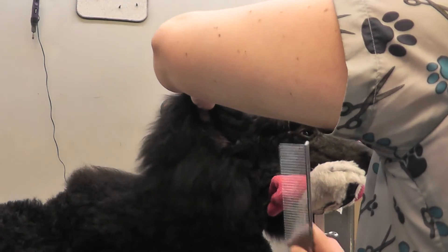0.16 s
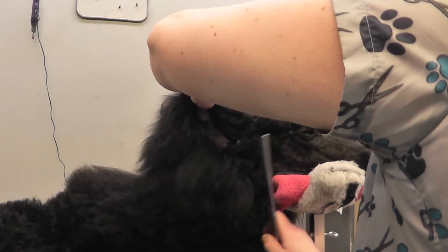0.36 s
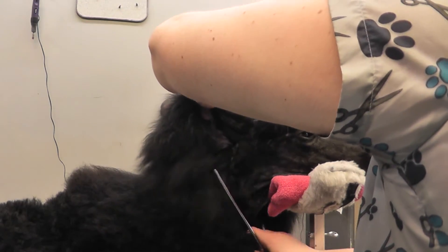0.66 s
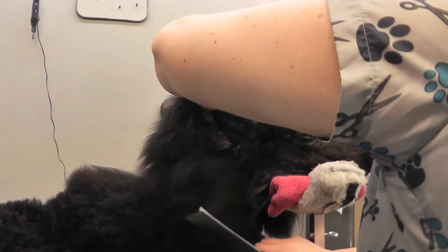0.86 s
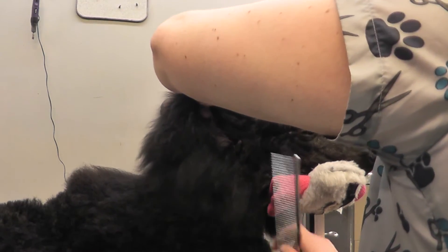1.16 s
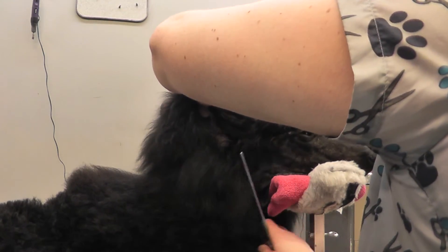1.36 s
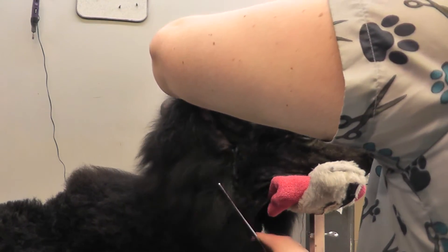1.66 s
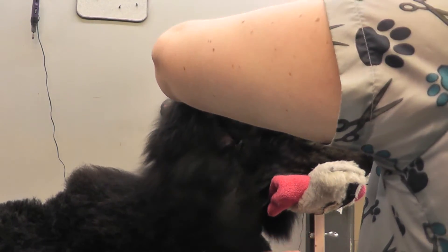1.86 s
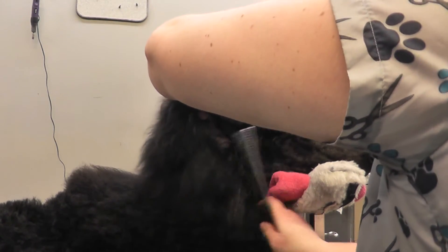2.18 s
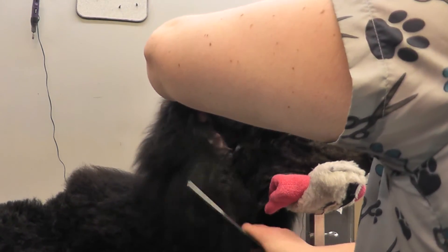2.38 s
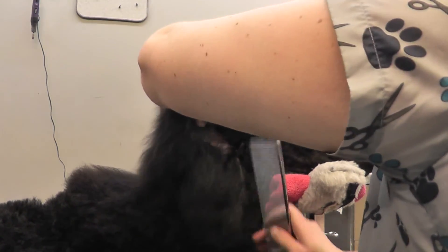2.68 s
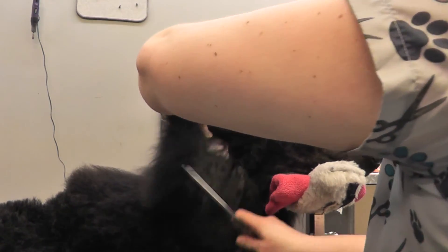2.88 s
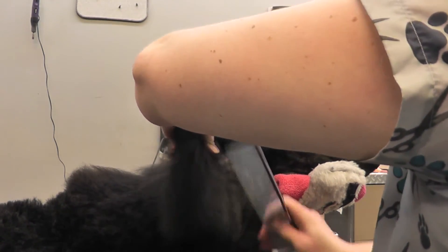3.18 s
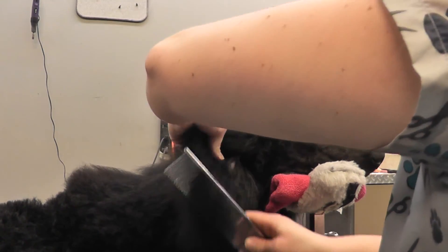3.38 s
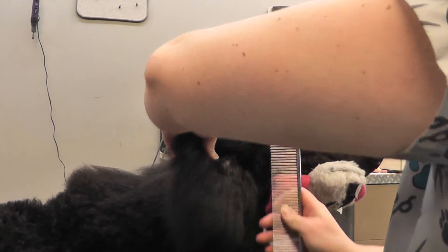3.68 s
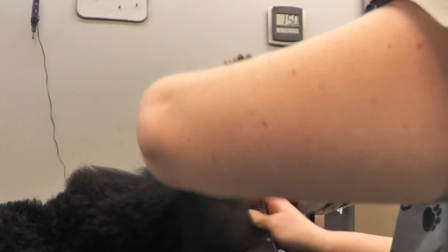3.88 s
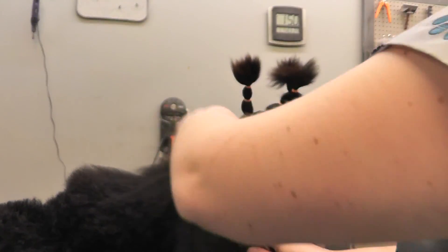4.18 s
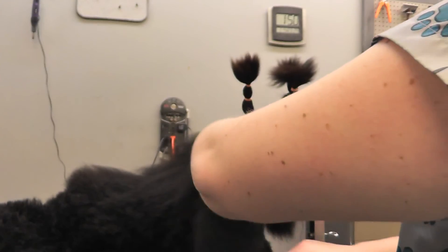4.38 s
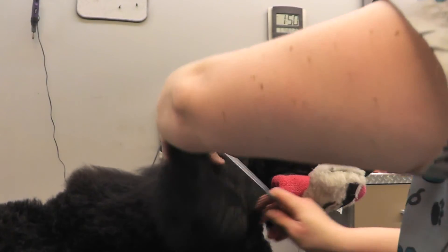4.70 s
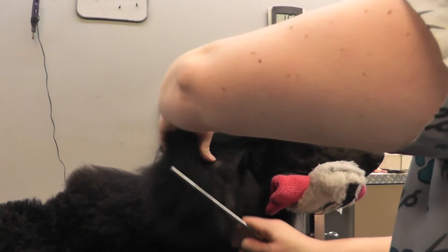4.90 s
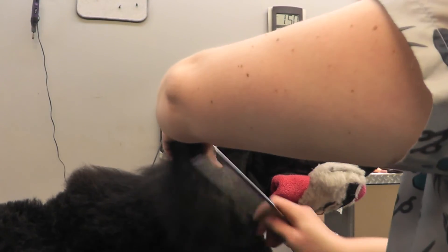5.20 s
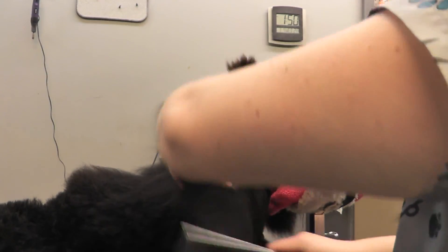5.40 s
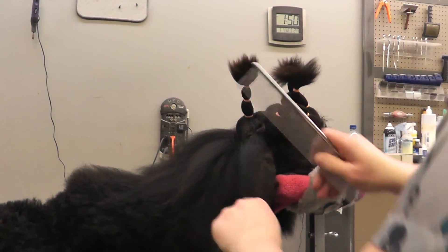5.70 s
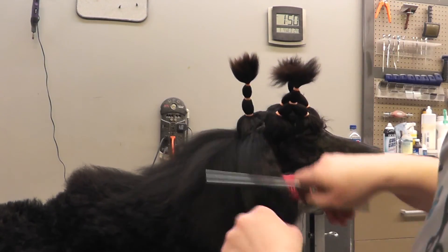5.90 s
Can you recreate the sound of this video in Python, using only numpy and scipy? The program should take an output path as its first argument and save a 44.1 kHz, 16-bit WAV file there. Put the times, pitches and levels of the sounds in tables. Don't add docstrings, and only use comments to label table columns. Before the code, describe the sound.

A small, hard-walled grooming room, heard from close by in stereo. Throughout, a mains-powered machine gives a low steady hum strongest around 240 hertz, with soft air noise, a faint panel buzz and a throb nearly three times a second. From 0.1 to 1 s, light comb strokes hiss through long dog hair, with small ticks. At 1.27 s the metal comb clacks on a steel edge, bright and by far the loudest event, bouncing instantly and ringing for under half a second. Dull table thuds follow at 1.4 s. Strokes continue from 1.45 to 5.4 s, some short and scratchy, with faint high whistles near 1.7 to 1.9 s and sleeve rustles from 2.2 s. A low creak comes around 4 s. Between 5.4 and 5.9 s a hand sweeps the coat as cloth rustle grows, with a snap at 5.88 s. From 5.99 s a hollow, gritty scrape judders abruptly to the end.

```python
import sys
import numpy as np
from scipy import signal
from scipy.fft import rfft, irfft, next_fast_len
from scipy.io import wavfile
from scipy.ndimage import uniform_filter1d

SR = 44100
rng = np.random.default_rng(int(sys.argv[2]) if len(sys.argv) > 2 else 0)


def transcribe(signal):
    frames = np.atleast_2d(signal).T
    limited = np.clip(frames, -1, 1)
    pcm = np.round(limited * 32767).astype(np.int16)
    wavfile.write(sys.argv[1], SR, pcm)


def attenuation_scalar(level_db):
    decades = np.asarray(level_db, float) / 20
    return 10 ** decades


N = 266805
T = np.arange(N) / SR
MAINS_HZ = 60.0023

# (time [s], peak level [dB])
CLACK_HITS = [
    (1.2671, 0),
    (1.2683, -10),
    (1.271, -17),
]


def colour(x, points):
    hz, db = np.transpose(points)
    size = next_fast_len(x.shape[-1])
    bins_hz = np.arange(1, size // 2 + 2) * SR / size
    gain = attenuation_scalar(np.interp(np.log(bins_hz), np.log(hz), db))
    return irfft(rfft(x, size) * gain, size)[..., :x.shape[-1]]


def unit(x):
    return x / np.sqrt(np.mean(x ** 2))


def band(x, hz, width):
    return signal.lfilter(*signal.iirpeak(min(hz, .45 * SR), hz / width, SR), x)


def resonance(x, hz, width):
    return band(band(x, hz, width), hz, width)


def walk(rate):
    hold = int(SR / rate)
    steps = np.repeat(rng.standard_normal(N // hold + 1), hold)
    return uniform_filter1d(uniform_filter1d(steps, hold), hold)[:N]


def strike(hits, modes, scatter_db):
    out, t = np.zeros(N), T[:SR // 2]
    hz, db, t60 = np.transpose(modes)[:, :, None]
    decay = attenuation_scalar(-60 * t / np.clip(t60, .01, .35))
    for (s, peak_db), luck in zip(hits, rng.standard_normal((len(hits), len(modes), 2))):
        start = int(s * SR)
        strength = attenuation_scalar(db + scatter_db * luck[:, :1]) * np.sign(luck[:, 1:])
        ring = (strength * np.sin(2 * np.pi * hz * t) * decay).sum(axis=0)[:N - start]
        out[start:start + len(ring)] += attenuation_scalar(peak_db) * ring / np.abs(ring).max()
    return out


def strokes(rows):
    grip_s, let_go_s = 0.0071, 0.046
    gain = np.zeros(N)
    for start, end, first_db, last_db in rows:
        slide = attenuation_scalar(np.interp(T, (start, end), (first_db, last_db)))
        grip = 1 - np.exp(-np.maximum(T - start, 0) / grip_s)
        gain += slide * grip * np.exp(-np.maximum(T - end, 0) / let_go_s)
    return gain


def rustle(rows, points, grain_db, side_db, patchy_db):
    size_db = grain_db * np.minimum(rng.exponential(size=N), 5.5) + patchy_db * walk(40)
    grains = rng.standard_normal((2, N)) * attenuation_scalar(size_db)
    mid, side = (unit(colour(g, points)) * strokes(rows) for g in grains)
    return np.array([mid + attenuation_scalar(side_db) * side, mid - attenuation_scalar(side_db) * side])


def spread(x, lag_s, side_db):
    side = attenuation_scalar(side_db) * np.roll(band(x, 1400, 1400), int(lag_s * SR))
    return np.array([x + side, x - side])


def hum():
    # (multiple of mains [1], left [dB], right [dB], phase by which left leads [rad])
    harmonics = [(1, -63, -65, -.6), (2, -36.5, -39.8, .1), (3, -50, -52.5, -.14), (4, -29.3, -28.7, .08),
                 (6, -39.7, -39.8, -.23), (7, -63, -60, -.1), (8, -62, -46, -3.1), (10, -69, -64, 0),
                 (12, -59, -55, .5), (13, -63, -67, -.2), (18, -64, -63, -.3), (22, -70, -70, 0),
                 (24, -61, -66, -1.2), (26, -70, -68, -.3), (38, -72, -72, 0)]
    offset, slope, bend = (-1.3, -.375, -.19)
    out = np.zeros((2, N))
    for k, left_db, right_db, lead in harmonics:
        phase = 2 * np.pi * k * MAINS_HZ * T + offset + slope * k + bend * k ** 2
        level = attenuation_scalar(np.array([[left_db], [right_db]]))
        turn = np.exp(.5j * np.array([[lead], [-lead]]))
        out += (level * turn * np.exp(1j * phase)).real
    return np.sqrt(2) * out * attenuation_scalar(.5 + .3 * walk(3) + .2 * walk(6))


def machine():
    # (frequency [Hz], level [dB per Hz])
    air_mid = [(20, -96), (36, -83), (47, -76), (65, -76), (120, -71.5), (230, -68), (330, -73.5),
               (550, -76.5), (770, -82), (850, -82.5), (1700, -88), (3800, -94), (7000, -99), (11000, -104)]
    # (frequency [Hz], level [dB per Hz])
    air_side = [(20, -111), (60, -76), (130, -68), (280, -70), (520, -72.5), (800, -79.5), (1400, -87),
                (2300, -98.5), (3100, -108), (3600, -135), (8200, -135), (10000, -112), (14000, -110),
                (15500, -118)]
    # (frequency [Hz], width [Hz], level [dB], depth [dB])
    cabinet = [(183.5, 14, -50.5, 0), (273.6, 24, -54, 0.5), (672.4, 65, -57.5, 5), (756.4, 25, -62, 5),
               (44.6, 11, -62.5, 4), (117.4, 19, -53.5, 7.5)]
    # (frequency [Hz], width [Hz], level [dB])
    panel = [(2670, 134, -62.5), (2920, 550, -63.5), (2060, 160, -67), (4570, 260, -71)]
    throb_hz, throb_first_s = 2.9, 0.27
    white = rng.standard_normal((2, N)) * np.sqrt(SR / 2)
    mid = colour(white[0], air_mid + [(16000, -110)])
    side = colour(white[1], air_side)
    turn = np.cos(2 * np.pi * throb_hz * (T - throb_first_s))
    for hz, width, db, depth_db in cabinet:
        mid = mid + attenuation_scalar(db + depth_db * turn) * unit(resonance(rng.standard_normal(N), hz, width))
    cycle = T * MAINS_HZ + .13
    luck = rng.standard_normal(int(cycle[-1]) + 1)[cycle.astype(int)]
    size = attenuation_scalar(3.5 * luck + .8 * walk(3.04))
    rattle = rng.standard_normal(N) * (.35 + size * np.exp(-(cycle % 1) / .12))
    for hz, width, db in panel:
        mid = mid + attenuation_scalar(db) * unit(resonance(rattle, hz, width))
    return np.array([mid + side, mid - side])


def hair():
    # (start [s], end [s], first level [dB], last level [dB])
    pulls = [(.08, .27, -58, -61), (.34, .55, -56, -57), (.57, .7, -63, -65), (.76, .975, -60.5, -57),
             (1.45, 1.975, -57, -58), (2.06, 2.13, -60, -60), (2.19, 2.27, -48, -50),
             (2.31, 2.53, -65, -57), (2.58, 2.78, -63, -58.5), (2.81, 2.85, -49, -56),
             (2.89, 3.0, -67, -53), (3.02, 3.1, -65, -62), (3.13, 3.475, -65, -55),
             (3.6, 4.115, -60.5, -52.5), (4.19, 4.68, -58.5, -56.5), (4.68, 4.77, -63, -48),
             (4.82, 5.05, -60, -54), (5.18, 5.4, -61, -56.5)]
    # (frequency [Hz], level [dB per Hz])
    coat = [(1500, -10), (3300, 7), (5000, 0.5), (6500, 2.5), (9000, -1), (11000, -9.5), (15500, -14)]
    # (start [s], end [s], first level [dB], last level [dB])
    sweeps = [
        (5.37, 5.55, -58, -52),
        (5.57, 5.83, -55.5, -51),
        (5.855, 5.94, -51, -52.5),
    ]
    # (frequency [Hz], level [dB per Hz])
    palm = [(1200, -26), (2200, -7), (3600, 0.5), (5000, -5.5), (6500, -2.5), (9000, -11), (11000, -20),
            (15000, -29)]
    combed = rustle(pulls, coat, grain_db=4.0, side_db=-18.5, patchy_db=1.0)
    return combed + attenuation_scalar(3.0) * rustle(sweeps, palm, grain_db=3.0, side_db=-15.5, patchy_db=1.3)


def ticks():
    # (time [s], peak level [dB], frequency [Hz], width [Hz])
    snaps = [(.357, -41, 7000, 5000), (.9457, -36, 2930, 900), (1.385, -33, 910, 250),
             (1.385, -34, 1410, 300), (1.385, -38, 2500, 1190), (1.927, -39, 7000, 3500),
             (1.948, -44, 7000, 2500), (1.959, -46, 6500, 5000), (1.972, -42, 6500, 2500),
             (1.987, -47, 7500, 3000), (2.197, -45, 3400, 490), (2.263, -36, 8700, 1500),
             (2.264, -51, 9750, 45), (2.264, -51, 11400, 300), (3.012, -43, 6570, 500),
             (3.461, -47, 8500, 3000), (4.437, -40, 7500, 3500), (5.604, -36, 1300, 1200),
             (5.795, -34, 650, 300), (5.8794, -24.5, 600, 700), (5.8797, -25.5, 2200, 1300),
             (2.264, -42, 3200, 500), (5.794, -38.5, 1600, 1500), (5.729, -34, 800, 600)]
    out, t = np.zeros(N), T[:SR // 20]
    for (s, db, hz, width), noise in zip(snaps, rng.standard_normal((len(snaps), len(t)))):
        snap = band(band(noise * np.exp(-t / 0.00084), hz, width), hz, 2 * width)
        out[int(s * SR):int(s * SR) + len(t)] += attenuation_scalar(db) * snap / np.abs(snap).max()
    return out


def clack():
    # (frequency [Hz], level [dB], t60 [s])
    comb = [(800, -20, 0.025), (1414, -19, .12), (1640, -20, 0.13), (1300, -7.5, 0.043), (2087, -9, 0.028),
            (2500, -22, 0.075), (3200, -21, 0.018), (3580, -29, 0.39), (3602, -3.5, 0.035),
            (3650, -24.5, .3), (4330, -15, 0.037), (4740, -24, 0.13), (5700, -8, 0.019), (5950, -1, 0.015),
            (6557, -30, .15), (6870, -2, 0.041), (7330, -18, 0.14), (8380, -0.5, 0.022),
            (9130, 7.5, 0.0079), (9030, -12, 0.035), (11400, -27, 0.016)]
    # (frequency [Hz], level [dB per Hz])
    contact = [(600, -25), (1000, -22), (1500, 2.5), (2100, -21), (2700, -16), (3500, 8), (4700, -14),
               (6000, -3.5), (9200, -3), (10800, -15), (11400, -45), (12400, -43), (13100, -15),
               (15800, -30), (16300, -71)]
    # (frequency [Hz], t60 [s])
    room = [(1500, 0.62), (3500, 0.58), (6500, 0.42), (9000, 0.094), (14000, 0.12)]
    # (delay [s], level [dB])
    echoes = [(.0065, -27), (0.0131, -10), (.024, -29)]
    # (frequency [Hz], width [Hz], level [dB], t60 [s])
    edge = [(1390, 120, -38.5, 0.41), (1630, 99, -40.5, 0.51), (2500, 570, -38.5, 0.39),
            (3510, 460, -28, 0.35), (4180, 520, -33.5, 0.29), (5080, 400, -37, .22), (5920, 650, -31, 0.29),
            (6700, 660, -28, 0.25), (8200, 800, -34, 0.23), (9300, 580, -29.5, 0.19),
            (10500, 500, -40, 0.11), (13200, 700, -49, .2), (15000, 800, -47, .2)]
    contact_s = 0.00014
    first_s, t = CLACK_HITS[0][0], T[:SR // 2]
    start = int(first_s * SR)
    gate = np.zeros(len(t))
    for s, db in CLACK_HITS:
        since = t + first_s - s
        gate += attenuation_scalar(db) * (t >= s - first_s) * np.exp(-np.maximum(since, 0) / 0.002)
    crack = colour(gate * rng.standard_normal(len(t)), contact) * (t < .2)
    ring = strike(CLACK_HITS, comb, scatter_db=0.5)[start:start + len(t)]
    direct = (attenuation_scalar(-3.0) * ring + attenuation_scalar(-2.0) * crack) * (1 - np.exp(-(t / contact_s) ** 2))

    diffuse = rng.standard_normal((2, len(t))) * (1 - np.exp(-t / 0.0079))
    shiver = sum(unit(resonance(diffuse, hz, width)) * attenuation_scalar(db - 60 * t / t60) for hz, width, db, t60 in edge)
    paths = sum(resonance(diffuse, hz, 1.0 * hz) * attenuation_scalar(-60 * t / t60) for hz, t60 in room)
    reverb = signal.fftconvolve(ring[None], paths, axes=1)[:, :len(t)]
    mid, side = shiver + attenuation_scalar(-48) * reverb

    early = direct + sum(attenuation_scalar(db) * np.roll(direct, int(s * SR)) for s, db in echoes)
    lean = attenuation_scalar(-14) * band(early, 11000, 7000)
    mid, side = early + mid, attenuation_scalar(-14.0) * side - lean
    return np.pad(np.array([mid + side, mid - side]), ((0, 0), (start, N - start - len(t))))


def bumps():
    # (time [s], peak level [dB])
    blows = [
        (1.386, -23.5),
        (1.402, -24.5),
        (1.45, -28),
    ]
    # (frequency [Hz], level [dB], t60 [s])
    tabletop = [(45, -13, 0.21), (141, -20, 0.16), (207, 4, 0.18), (280, -4, 0.24), (384, -9, 0.075),
                (1350, -16, 0.097)]
    return strike(blows, tabletop, scatter_db=5.5)


def whistles():
    # (start [s], length [s], frequency [Hz], width [Hz], level [dB])
    tones = [(1.68, .07, 8200, 250, -68), (1.82, .11, 12600, 350, -62), (2.815, 0.029, 8500, 6000, -53),
             (3.45, 0.048, 9300, 2500, -61), (1.6, 0.1, 3700, 800, -63)]
    out = np.zeros(N)
    for s, length, hz, width, db in tones:
        swell = np.sin(np.pi * np.clip((T - s) / length, 0, 1))
        out += attenuation_scalar(db) * unit(resonance(rng.standard_normal(N), hz, width)) * swell
    return out


def arm():
    # (start [s], end [s], first level [dB], last level [dB])
    moves = [(2.2, 2.44, -52, -61), (2.48, 2.6, -50, -67), (2.82, 2.9, -53, -60), (3.74, 4.3, -56, -59),
             (4.63, 4.8, -60, -53), (4.84, 5.04, -65, -56), (5.3, 5.9, -64, -45.5), (5.93, 5.99, -69, -49)]
    # (frequency [Hz], level [dB per Hz])
    cloth = [(250, -26), (500, 4.5), (900, 1), (1500, 0.5), (3000, -8.5), (8000, -39)]
    # (start [s], end [s], first level [dB], last level [dB])
    leaning = [(3.94, 4.115, -41, -43.5)]
    # (frequency [Hz], level [dB per Hz])
    creak = [(330, -23), (490, -2.5), (600, -12), (760, -9), (1000, -17), (1500, -30), (3000, -61)]
    sleeve = rustle(moves, cloth, grain_db=5.5, side_db=-12.5, patchy_db=1.7)
    return attenuation_scalar(1.5) * sleeve + rustle(leaning, creak, grain_db=2.5, side_db=-6, patchy_db=3.5)


def scrape():
    # (time [s], peak level [dB])
    slips = [(5.9915, -27.5), (5.9945, -27.5), (6.004, -40), (6.012, -36), (6.0187, -21.5), (6.023, -25.5),
             (6.028, -32), (6.034, -29), (6.039, -30), (6.0455, -23), (6.048, -29)]
    # (frequency [Hz], level [dB], t60 [s])
    hollow = [(452, 2.5, 0.085), (560, 0, 0.041), (700, -3, 0.11), (960, 0, 0.032), (1440, -1, 0.034),
              (2500, -19, .012), (3770, -5, .012), (6000, -10, 0.019)]
    rasp_db, rasp_rise_db_per_s = -43.5, 148
    since = T - slips[0][0]
    gate = (since > 0) * attenuation_scalar(rasp_db + rasp_rise_db_per_s * since)
    for s, db in slips:
        gate = gate + attenuation_scalar(db - 10.5) * (T >= s) * np.exp(-np.maximum(T - s, 0) / 0.0039)
    grit_colour = [(300, -6), (1300, 3), (2500, -5.5), (5000, -9), (6200, -13), (7200, -19), (16000, -46)]
    grit = unit(colour(rng.standard_normal(N), grit_colour))
    return attenuation_scalar(3.5) * strike(slips, hollow, scatter_db=-0.5) + gate * grit


def scene():
    near = ticks() + bumps() + whistles() + scrape()
    steady = hum() + machine() + hair() + arm() + spread(near, lag_s=0.00093, side_db=-8.0)
    lowpass = signal.ellip(14, .3, 70, 15760, fs=SR, output="sos")
    return signal.sosfilt(lowpass, steady) + clack()


def band_limit(x):
    return signal.sosfilt(signal.butter(12, 16580, fs=SR, output="sos"), x)


def record(dry):
    since = np.maximum(T - CLACK_HITS[0][0], 0)
    duck_db = -2.5 * (1 - np.exp(-since / 0.8)) * np.exp(-since / .5)
    return band_limit(np.clip(dry * attenuation_scalar(duck_db), -1, 1))


dry = scene()
out = record(dry)
transcribe(out)
```